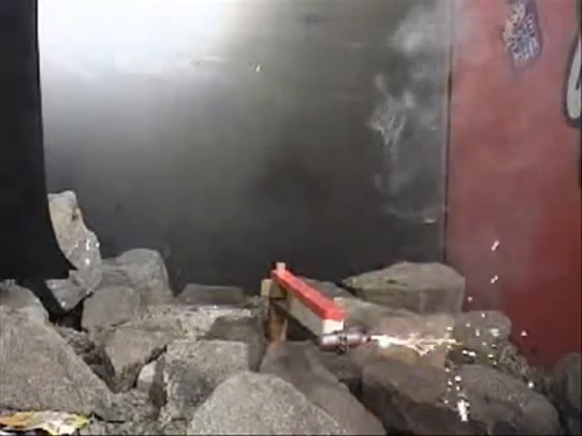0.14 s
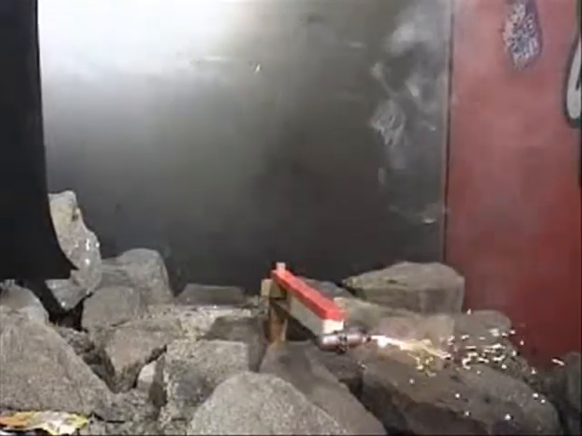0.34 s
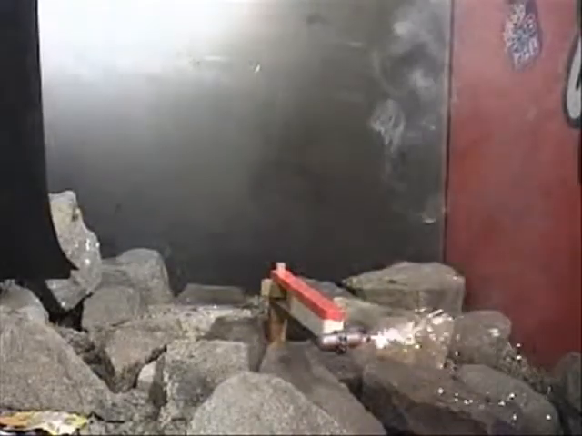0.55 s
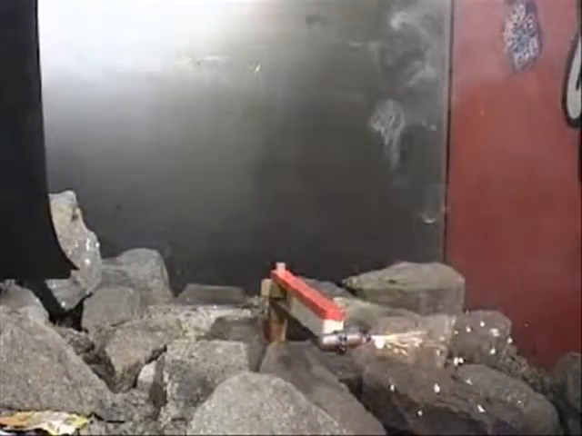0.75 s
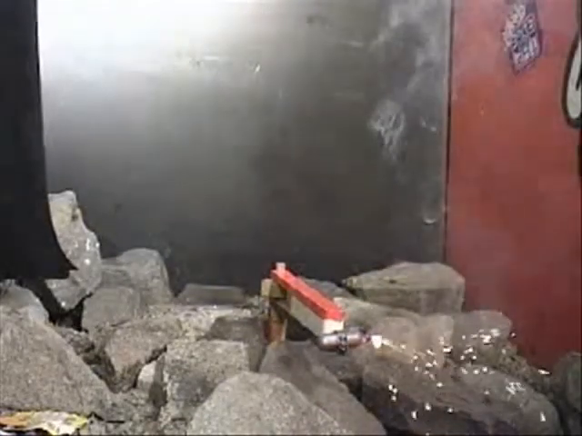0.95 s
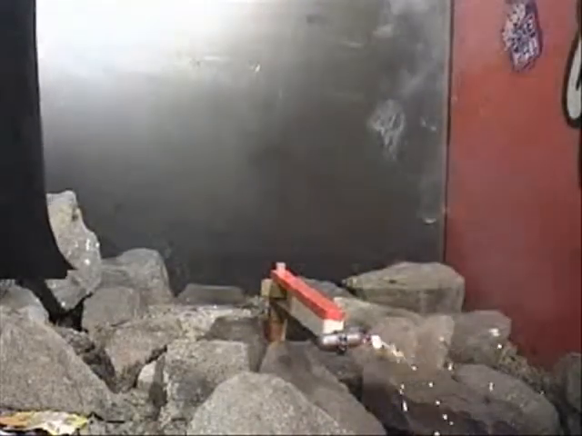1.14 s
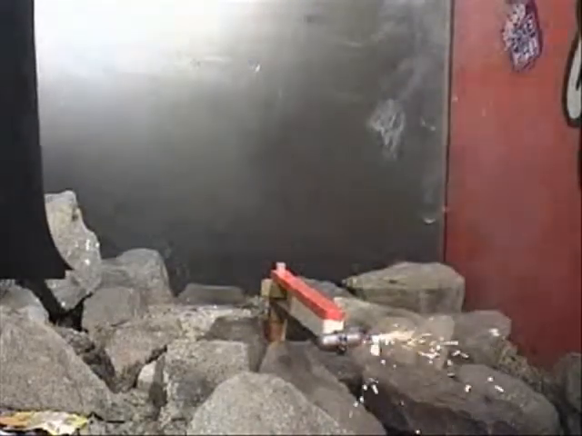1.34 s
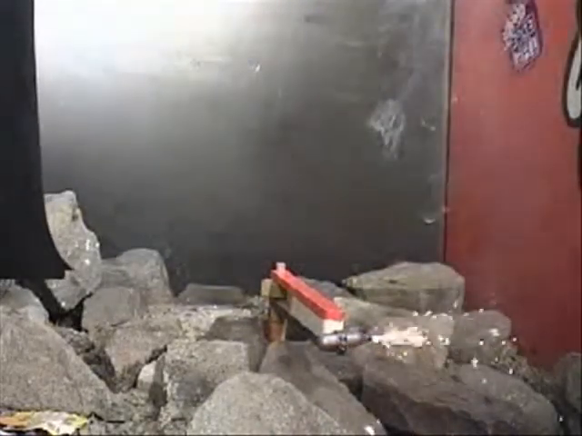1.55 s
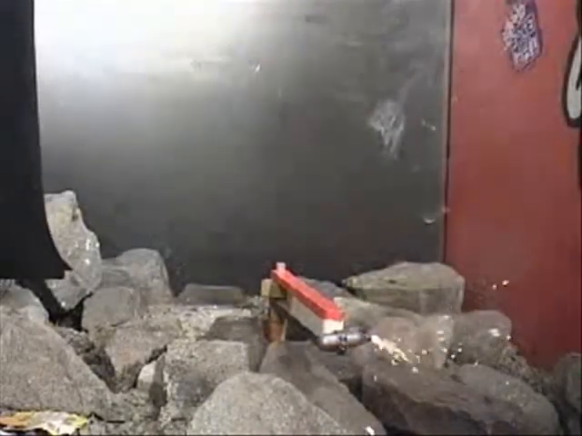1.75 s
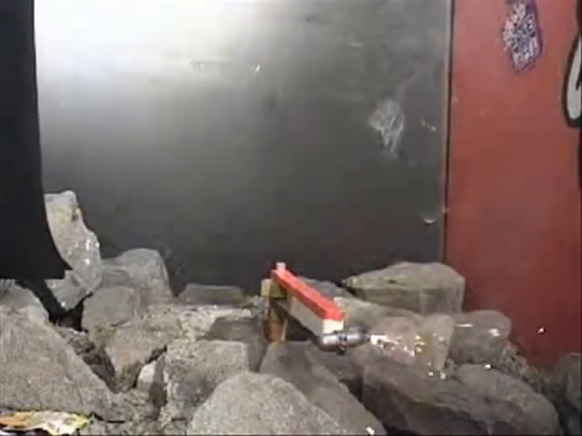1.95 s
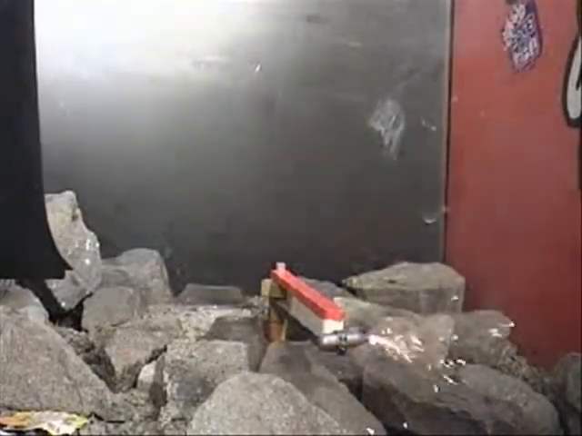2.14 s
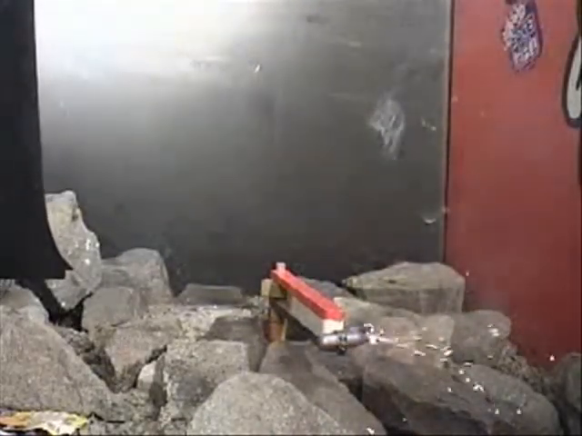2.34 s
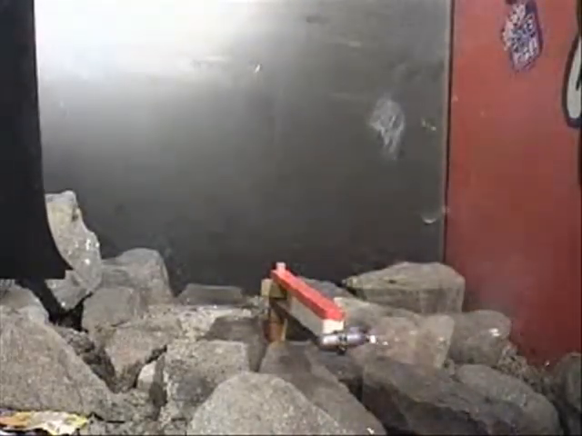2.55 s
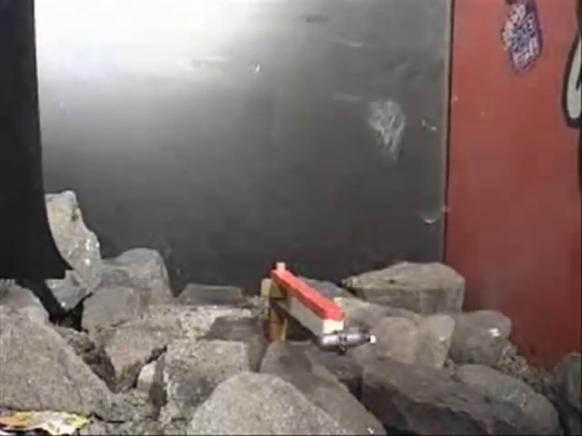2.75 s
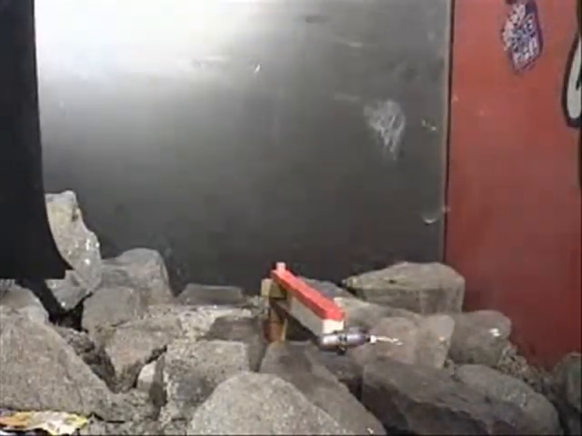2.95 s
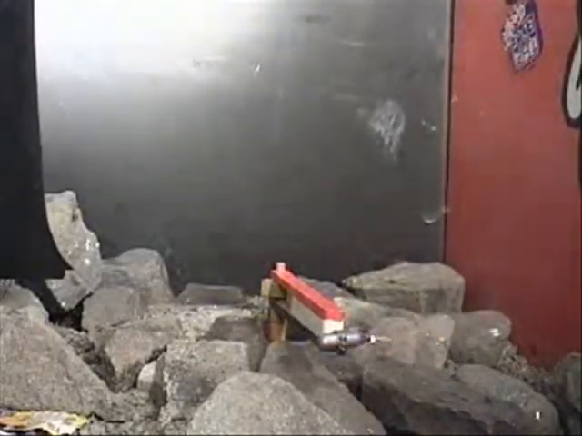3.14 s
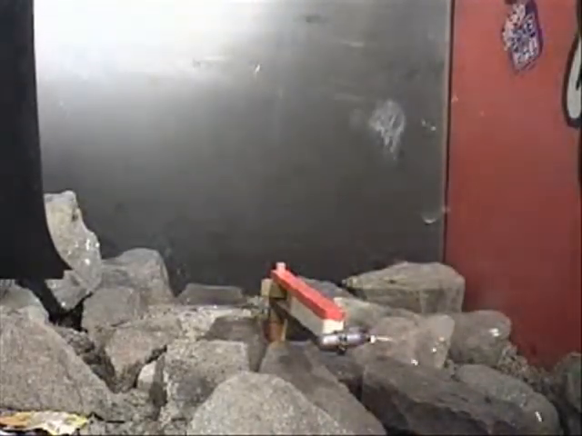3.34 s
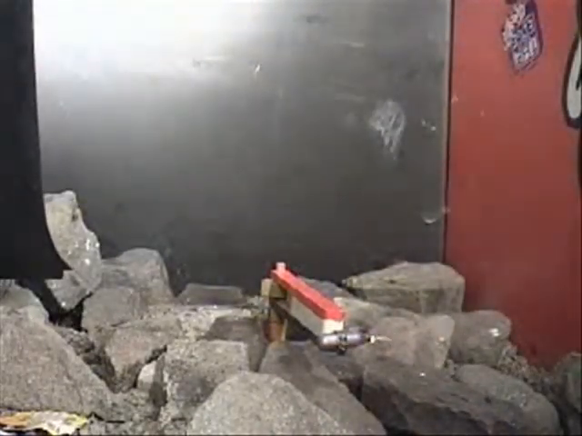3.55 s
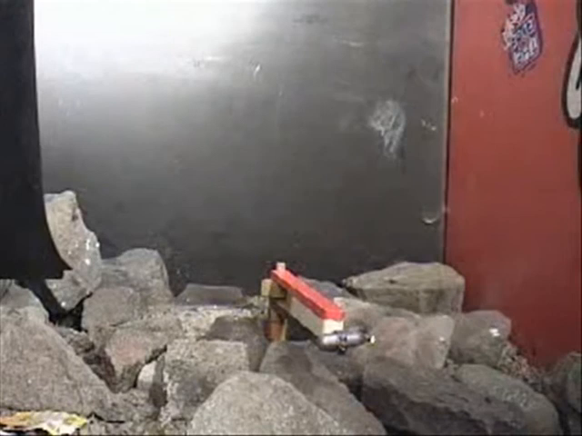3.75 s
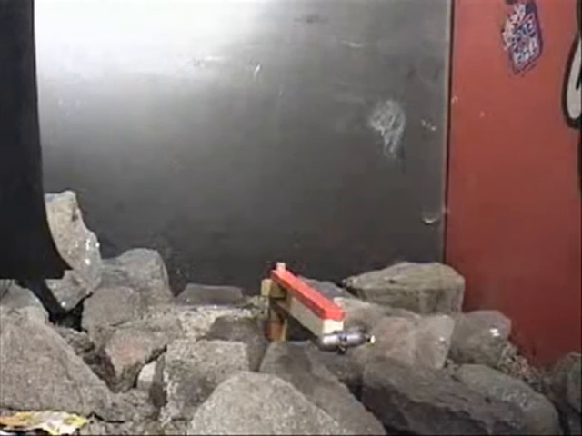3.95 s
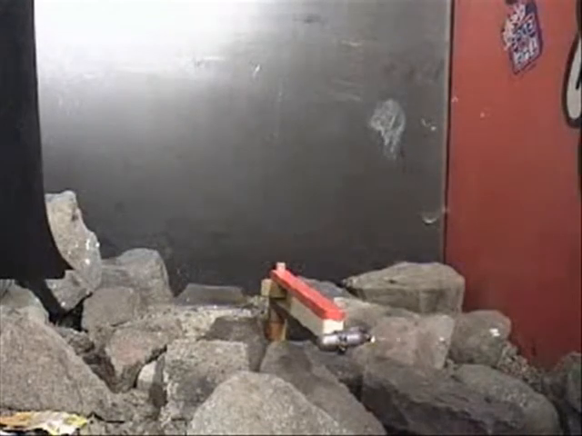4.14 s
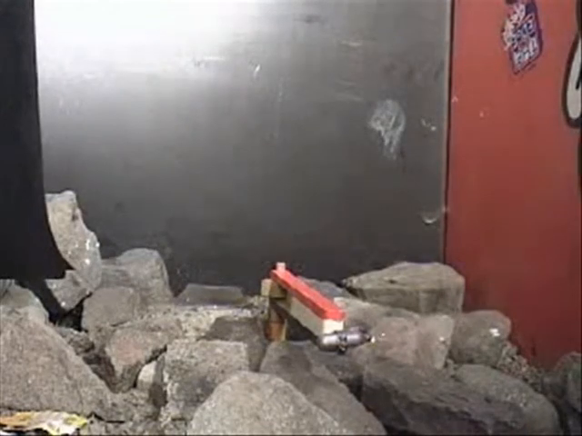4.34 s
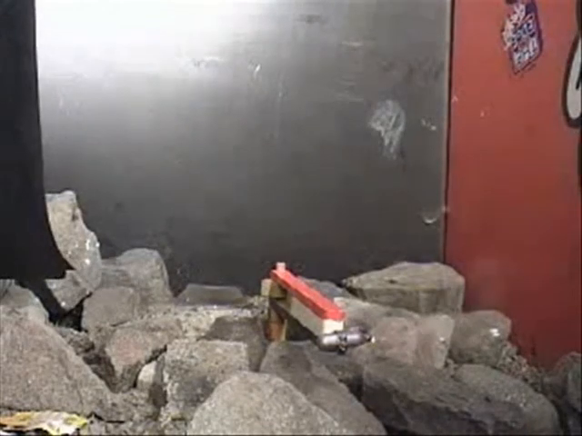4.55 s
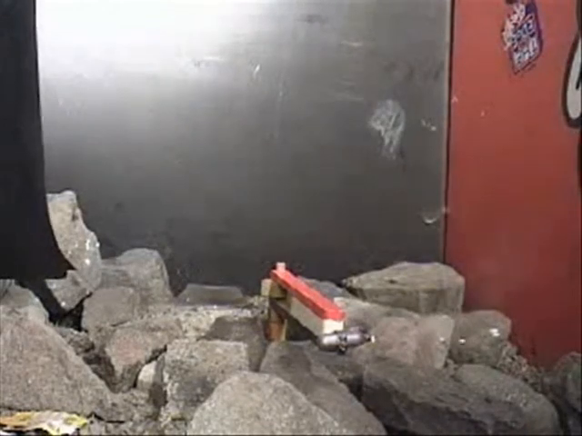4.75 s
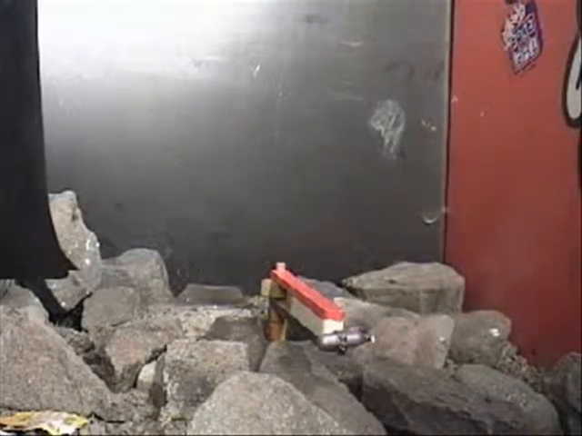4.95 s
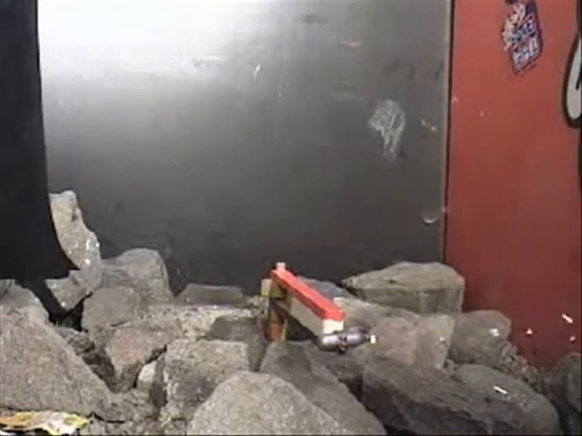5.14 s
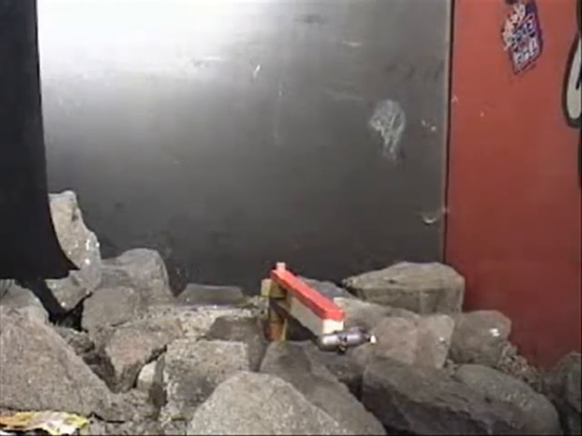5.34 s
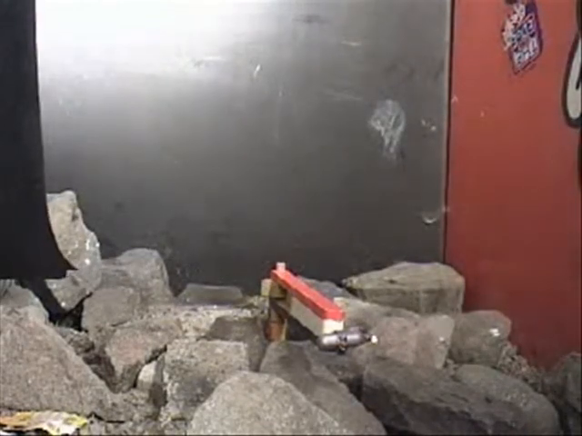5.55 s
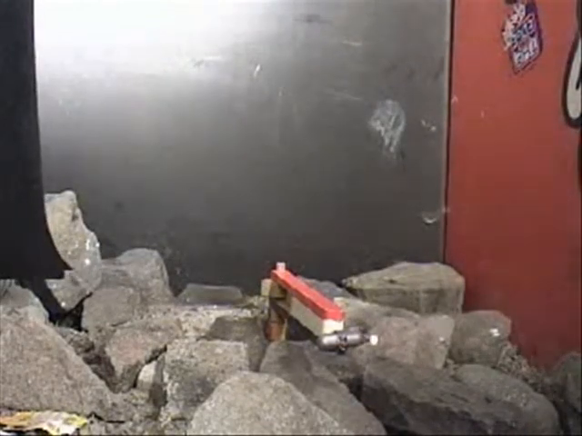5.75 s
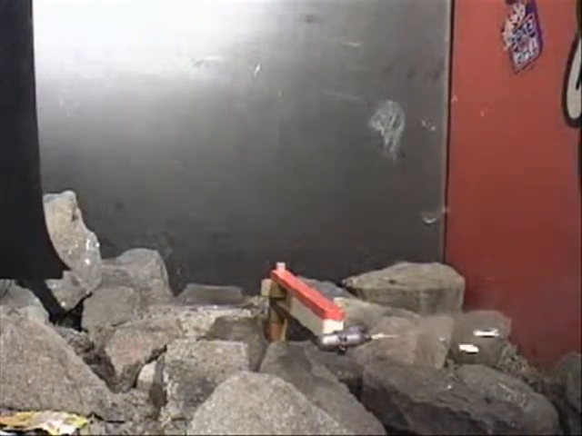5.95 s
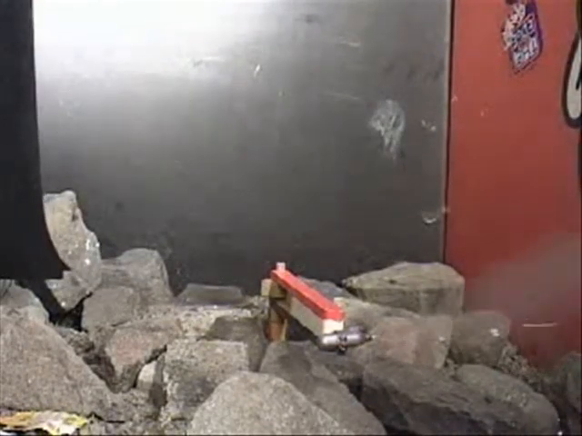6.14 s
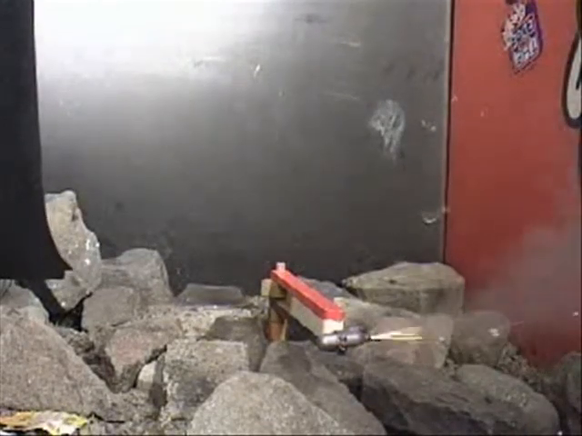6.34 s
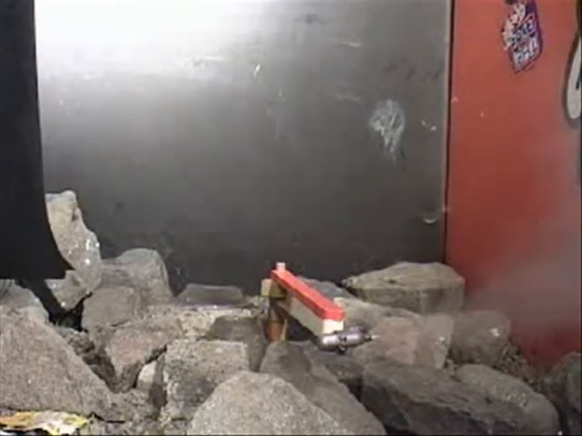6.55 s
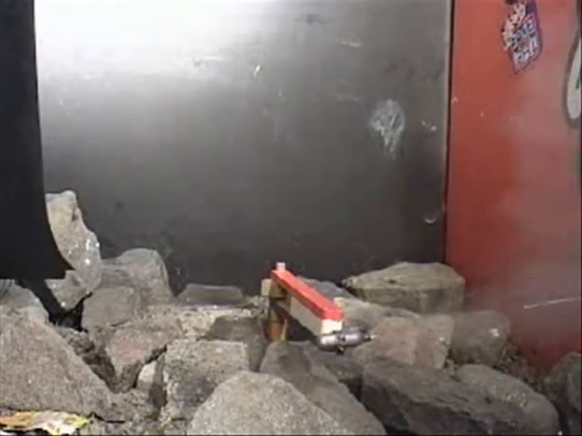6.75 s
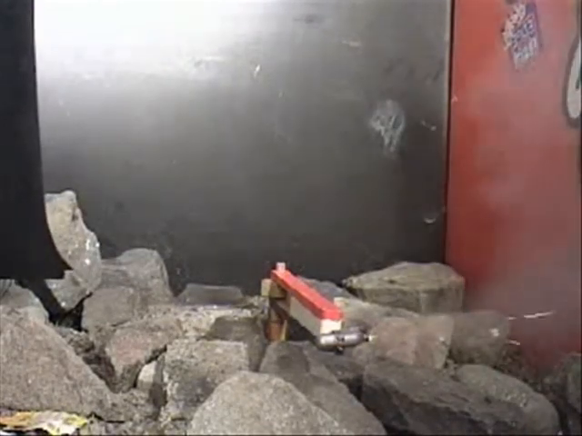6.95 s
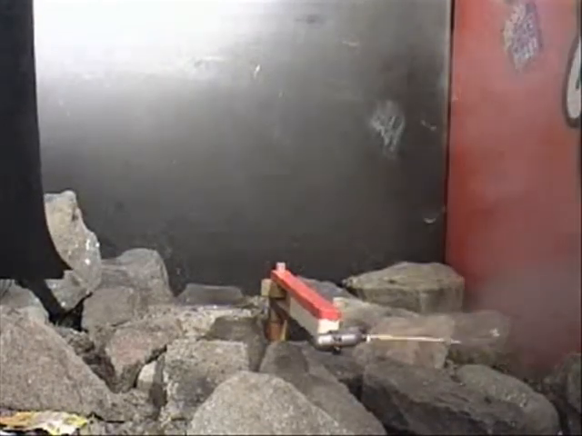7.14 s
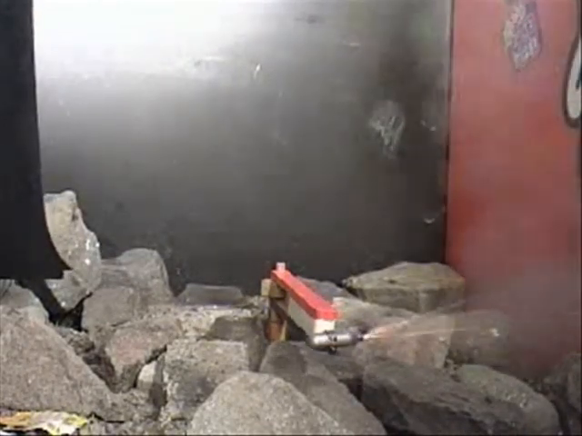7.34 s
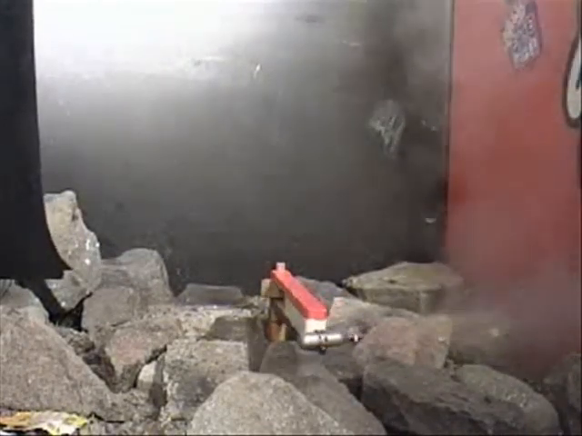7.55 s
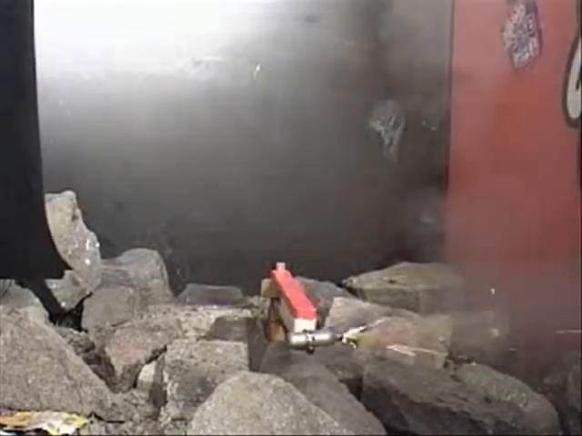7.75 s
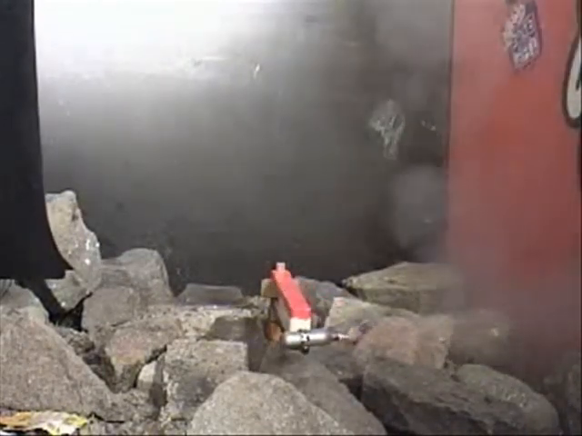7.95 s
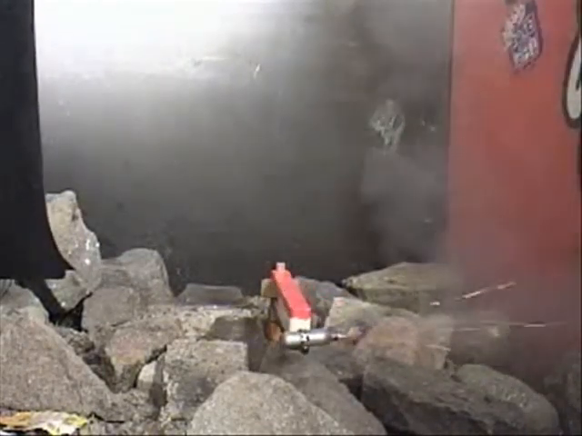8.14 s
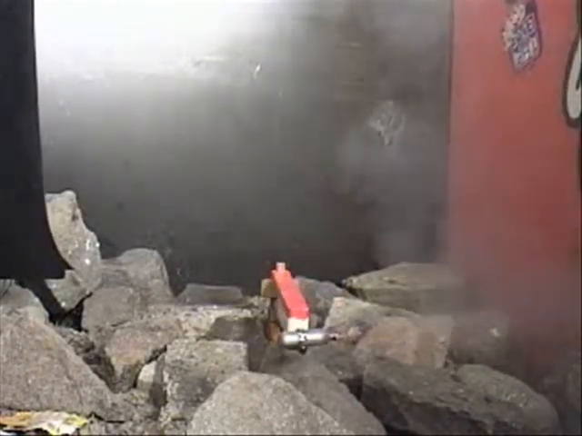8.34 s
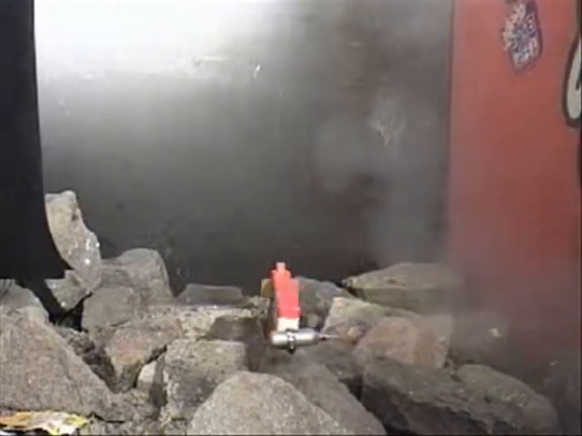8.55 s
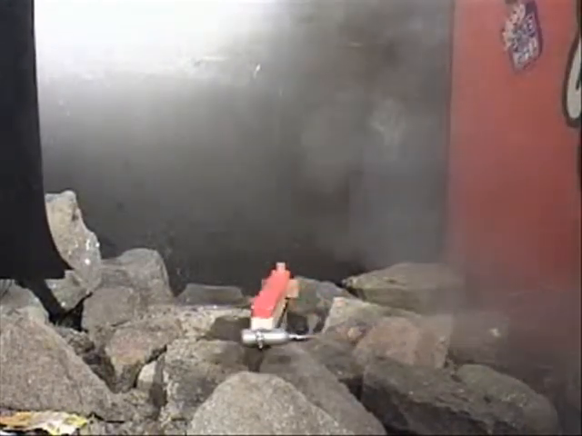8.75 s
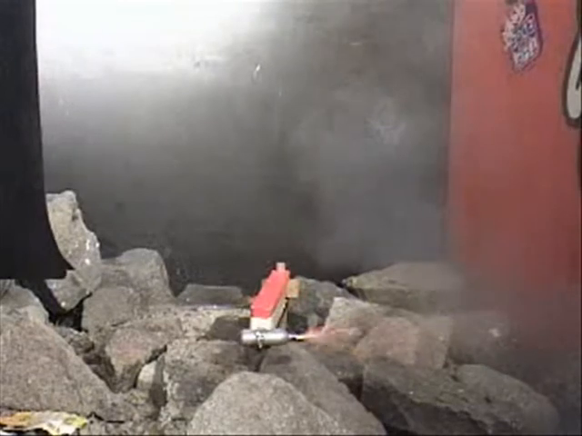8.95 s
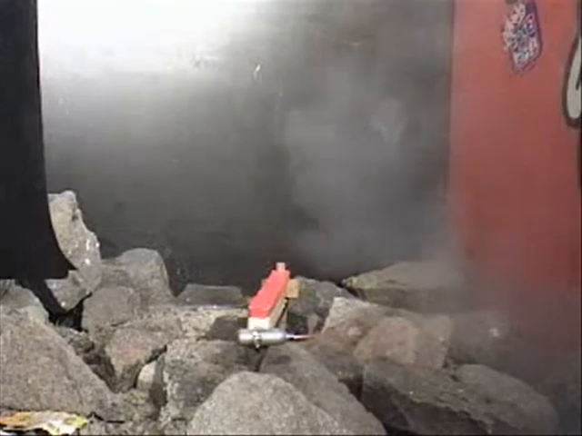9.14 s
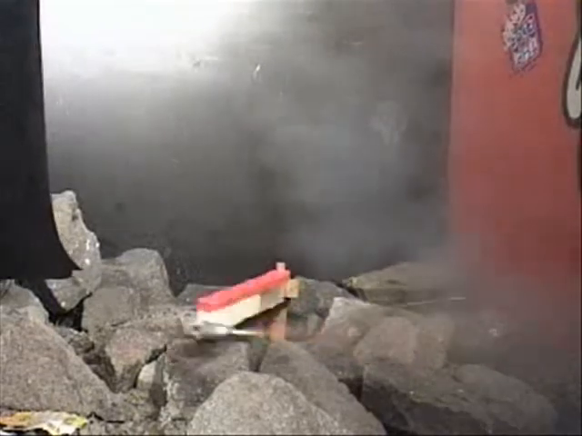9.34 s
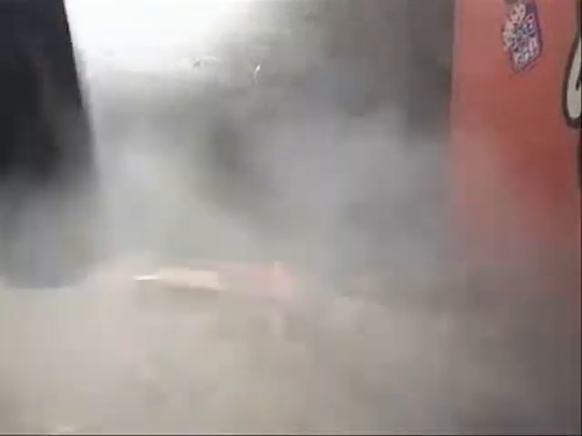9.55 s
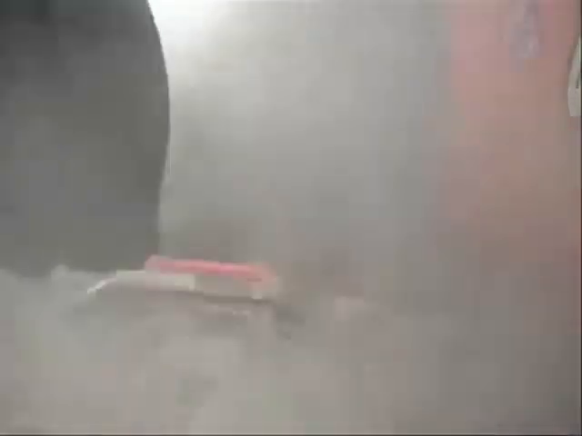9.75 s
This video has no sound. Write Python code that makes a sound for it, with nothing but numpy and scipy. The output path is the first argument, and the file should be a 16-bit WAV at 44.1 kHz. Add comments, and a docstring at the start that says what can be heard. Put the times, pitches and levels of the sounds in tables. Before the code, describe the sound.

A fuse fizzes and spits in a small rocket motor among rocks outdoors, then sinks to a faint smoulder. The motor coughs several times and catches with a sharp puff and a low thump, building into a loud, steady jet hiss. Its tone shifts as it swings round, until the exhaust hits the microphone with a rough, rumbling rush. Far traffic hums very faintly underneath.

```python
"""Small rocket motor among rocks

A fuse spits and smoulders into the nozzle of a motor clamped near a wall. The charge coughs, catches
and blows a steady turbulent jet, coloured by the resonances and echoes of the rocks. The motor swings
round until its exhaust buffets the microphone. Far traffic hums below, with a faint sinking tone.
All passes through a tape camcorder's comb filter, tuned to cancel head-drum noise."""
import sys
import numpy as np
from scipy import signal
from scipy.fft import rfft, irfft, next_fast_len
from scipy.io import wavfile

SR = 44100
rng = np.random.default_rng(int(sys.argv[2]) if len(sys.argv) > 2 else 0)


def dump(signal):
    """Clip the signal to [-1, 1] and save it as 16-bit WAV at the path in sys.argv[1]."""
    limited = np.clip(np.atleast_2d(signal).T, -1, 1)
    pcm = np.round(limited * 32767).astype(np.int16)
    wavfile.write(sys.argv[1], SR, pcm)


N = 431298
TIME = np.arange(N) / SR
FFT_SIZE = next_fast_len(N + SR // 2)
HZ = np.maximum(np.fft.rfftfreq(FFT_SIZE, 1 / SR), 1)


def from_db(db):
    """Amplitude ratio of a level in decibels."""
    return 10 ** (np.asarray(db) / 20)


def unit_rms(x):
    """Normalisation to unit mean power."""
    return x / np.sqrt(np.mean(x ** 2) + 1e-20)


def in_time(rows):
    """Linear interpolation of each column of a time table at every sample."""
    times, *columns = np.transpose(rows)
    return [np.interp(TIME, times, column) for column in columns]


def at_hz(rows):
    """Interpolation of a frequency table on a logarithmic axis."""
    hz, values = np.transpose(rows)
    return np.interp(np.log(HZ), np.log(hz), values)


def filtered(x, response):
    """Convolution theorem: filtering multiplies the spectrum by a response."""
    return irfft(rfft(x, FFT_SIZE) * response, FFT_SIZE)[..., :N]


def drift(corner_hz):
    """Random fluctuation of unit rms: white noise through a two-pole low-pass."""
    pole = np.exp(-40 * np.pi * corner_hz / SR)   # one step per 20 samples
    slow = signal.lfilter([1], [1, -2 * pole, pole * pole], rng.standard_normal(N // 20 + 4002))[4000:]
    return np.interp(np.arange(N) / 20, np.arange(len(slow)), unit_rms(slow))


def stereo_noise(spectrum, correlation):
    """Partial coherence: the sum and difference of two independent coloured noises."""
    mid, side = rng.standard_normal((2, N))
    colour = from_db(at_hz(spectrum))
    mid = filtered(mid, colour * np.sqrt(1 + correlation))
    side = filtered(side, colour * np.sqrt(1 - correlation))
    return unit_rms(np.array([mid + side, mid - side]))


# Spectrum of far traffic: f/Hz, relative level/dB
TRAFFIC_SPECTRUM = [(20, -18), (45, -5.5), (90, 1), (130, -3), (220, -9.5), (290, -9.5), (350, -13),
                    (420, -11.5), (800, -12), (1350, -15), (1600, -25), (2200, -32.5), (6000, -27),
                    (14500, -35)]
# Its likeness in the two channels: f/Hz, correlation
TRAFFIC_CORRELATION = [(60, 0.75), (230, 0.52), (910, 0.43), (3550, 0.42), (13800, 0.11)]
# Its balance: f/Hz, level left over right/dB
TRAFFIC_BALANCE = [(60, 4.5), (370, 4.5), (2250, 6.5), (13800, -6)]

def traffic():
    """Incoherent superposition: far traffic merges into a dull hum, stronger on the left."""
    hum = stereo_noise(TRAFFIC_SPECTRUM, at_hz(TRAFFIC_CORRELATION)) * from_db(-49 + .8 * drift(6))
    return filtered(hum, from_db(at_hz(TRAFFIC_BALANCE) / 2 * [[1], [-1]]))


def far_tone(start_hz=339, sag_hz_per_s=4.6):
    """Slow modulation: a faint sinusoid sinks in pitch and wavers in level, stronger on the left."""
    hz = start_hz - sag_hz_per_s * TIME + 1.5 * drift(1)
    level_db = -61.5 + 2.5 * drift(1.5) + [[2], [-2]]
    return np.sin(2 * np.pi * np.cumsum(hz) / SR) * from_db(level_db)


# Exhaust pressure on the microphone ports: t/s, level/dB
BUFFET_LEVEL = [(8.8, -57.5), (9.2, -28.5), (9.45, -24), (9.5, -17.5), (9.78, -17.5)]
# Its spectrum: f/Hz, relative level/dB
BUFFET_SPECTRUM = [(25, -18), (100, -1), (250, 0.5), (700, 1), (1500, -2), (4000, -7), (9000, -15),
                   (14500, -24)]

def buffeting():
    """Pseudo-sound: eddies press on the ports, driving the channels partly in antiphase."""
    level_db, = in_time(BUFFET_LEVEL)
    return stereo_noise(BUFFET_SPECTRUM, correlation=-0.47) * from_db(level_db + 0.91 * drift(25))


def rock_scattering(t60_s=0.059, echo_db=-8):
    """Diffuse reflection: the response of direct sound plus decaying echoes, distinct in each channel."""
    t = np.arange(SR // 4) / SR
    echoes = rng.standard_normal((2, len(t))) * from_db(-60 * t / t60_s) * (t > .002)
    echoes /= np.sqrt(np.sum(echoes ** 2, axis=1, keepdims=True))
    return 1 + from_db(echo_db) * rfft(echoes, FFT_SIZE)


# Swing of the motor: t/s, heading (0 side-on, 1 half turned, 2 turned, 3 facing the microphone)
HEADING = [(7.1, 0), (7.9, 1), (8.35, 1.1), (8.8, 2), (9.25, 2), (9.45, 3)]
# Resonances of rocks and wall: f/Hz, width/Hz, gain/dB at headings 0, 1 and 2
RESONANCES = [(241, 83, 4, 5.5, 2), (521, 156, 9.5, 12.5, 8.5), (853, 64, 7.5, 4, 4),
              (1470, 880, -6, -2, 0.5), (1824, 340, 4.5, 1.5, 4.5), (2132, 77, -7, 1, 4),
              (2650, 310, 3, -3, 0.5), (2980, 210, -2.5, 5, 2.5), (3238, 282, 3, 6.5, 4.5),
              (3970, 450, -4, -5, 0.2), (4400, 350, 2.5, -1.5, -5), (4740, 290, -1.5, -5, -1.5),
              (5360, 250, 2.5, 2.5, 6.5), (5800, 880, -3, -5.5, -5), (6690, 290, 2.5, 5, 3),
              (7050, 185, 8, 6.5, 0), (7940, 300, 0.5, 2.5, -1), (8200, 540, -4, -2.5, 4),
              (9620, 790, -3.5, 3, 0.5), (10660, 1540, 2, 1, 2), (12000, 830, -4.5, 2, 2)]
# Likeness of the flame in the two channels: f/Hz, correlation
FLAME_CORRELATION = [(60, 0.78), (130, 0.93), (280, 0.99), (620, 0.84), (1340, 0.99), (2920, 1),
                     (6350, 0.81), (13800, 0.26)]
# Balance of the motor: f/Hz, level left over right/dB
MOTOR_BALANCE = [(60, 1), (230, 8), (910, 4.5), (3550, 2.5), (13800, 0)]

def among_rocks(motor):
    """Directivity: each heading excites its own resonances and echoes; the plume widens the image."""
    correlation = at_hz(FLAME_CORRELATION)
    mid, side = filtered(motor, np.sqrt([(1 + correlation) / 2, (1 - correlation) / 2]))
    stereo = np.array([mid + side, mid - side])
    balance_db = at_hz(MOTOR_BALANCE) / 2 * [[1], [-1]]
    peaks = np.array([2. ** -(2 * (HZ - hz) / width) ** 2 for hz, width, *_ in RESONANCES])
    gains_db = [*(np.array(RESONANCES)[:, 2:].T @ peaks), 0]   # head-on, the blast hides the resonances
    heading, = in_time(HEADING)
    out = 0
    for k, gain_db in enumerate(gains_db):
        crossfade = np.clip(1 - np.abs(heading - k), 0, 1)
        out += crossfade * filtered(stereo, rock_scattering() * from_db(gain_db + balance_db))
    return out


# Pressure surges as the charge catches: t/s, envelope peak level/dB
SURGES = [(5.497, -35), (5.928, -24)]

def thumps(ring_hz=170, rise_s=0.0025):
    """Damped oscillation: each pressure surge rings low for a cycle or two."""
    impulses = np.zeros(N)
    for start_s, peak_db in SURGES:
        impulses[round(start_s * SR)] = from_db(peak_db)
    t = np.arange(SR // 8) / SR
    envelope = t / rise_s * np.exp(1 - t / rise_s)
    return signal.fftconvolve(impulses, np.sin(2 * np.pi * ring_hz * t) * envelope)[:N]


def turbulence(crackle_share, spread_db, pops_per_s=4000):
    """Gaussian noise of the gas flow plus shot noise of burning specks popping in it."""
    sizes = from_db(spread_db * np.minimum(rng.exponential(1, N), 4)) * rng.choice([-1, 1], N)
    specks = unit_rms(sizes * (rng.random(N) < pops_per_s / SR))
    return np.sqrt(1 - crackle_share) * rng.standard_normal(N) + np.sqrt(crackle_share) * specks


# Spits and coughs of gas: t/s, onset level before filtering/dB
PUFFS = [(1.1433, -42), (1.495, -42), (1.6092, -31), (1.95, -34.5), (3.688, -47), (4.242, -47),
         (4.751, -31.5), (5.139, -26.5), (5.4206, -33), (5.46, -34), (5.496, -16), (5.7548, -26)]

def spits(decay_s=0.022):
    """Transient flow: each puff of gas starts at once and dies under a Gaussian envelope."""
    t = np.arange(SR // 4) / SR
    envelope = np.zeros(N)
    for start_s, onset_db in PUFFS:
        i = round(start_s * SR)
        envelope[i:i + len(t)] += from_db(onset_db) * np.exp(-(t / decay_s) ** 2)
    puffs = turbulence(crackle_share=0.15, spread_db=7) * envelope
    low_pass = 1 / np.sqrt((1 + (900 / HZ) ** 2) * (1 + (HZ / 8000) ** 4))
    return filtered(puffs, low_pass)


# Roar of the burn: t/s, base level/dB
ROAR_LEVEL = [(0, -44.5), (.25, -42), (.55, -43.5), (1.02, -45), (1.7, -44), (2.3, -48), (2.4, -51),
              (2.6, -56.5), (3.4, -58), (4.55, -57.5), (4.62, -47), (4.86, -47), (5.01, -42),
              (5.178, -36.5), (5.26, -49), (5.49, -45), (5.5, -32), (5.682, -35.5), (5.925, -24.5),
              (5.945, -30), (6.3, -26.5), (6.55, -22.5), (9.15, -22.5), (9.78, -25.5)]
# Passage of fire from fuse to charge: t/s, share of charge, sizzle over roar/dB, rumble over roar/dB
IGNITION = [(.3, 0.23, -1, -6), (1.3, 0.2, -1.5, -3.5), (1.5, .17, 1, -5.5), (2.3, .17, 2.5, -3.5),
            (2.6, 0.26, 6, -5.5), (4.0, 0.1, 5, -5), (4.1, 0.1, 8.5, -7), (4.55, 0, 8, -5),
            (4.62, .45, 0, -4.5), (5.0, 0.43, 4.5, -13.5), (5.9, 0.38, 3.5, -11), (6.1, 0.93, 2, -15.5),
            (6.4, 1, 2.5, -16), (9.2, 1, 3, -13), (9.45, 0.6, 3.5, -7)]
# Spectra of the burning fuse and charge: f/Hz, relative level/dB
FUSE_SPECTRUM = [(60, -8), (150, -8.5), (400, -10.5), (1200, -6), (2200, -3), (4200, -5), (6000, -3.5),
                 (9000, -1), (12500, -1), (14500, -22)]
CHARGE_SPECTRUM = [(60, -23), (150, -15.5), (400, -14.5), (1200, -11), (2500, -3), (3600, -1), (6000, -3.5),
                   (9000, -6), (12500, -11), (14500, -24.5)]
# Flares of the flame: t/s, roar gain/dB, half-width/s
FLARES = [(0.263, 3.5, 0.043), (.72, 2, 0.015), (.778, 6, .025), (0.85, 6.5, 0.028), (0.922, 3.5, .015),
          (1.158, 3.5, 0.019), (1.25, 4.5, 0.022), (1.531, 8, 0.023), (1.575, 8.5, 0.02), (1.676, 3, .018),
          (1.762, 8, 0.036), (1.886, 6.5, .037), (1.954, 3, .014), (2.1, 7, 0.024), (2.22, 8, .023),
          (2.318, 5.5, 0.016), (2.948, 4, .071), (4.1, 3, .03), (4.253, 6, .03), (4.622, 5.5, 0.016),
          (5.057, 10.5, .035), (5.29, 4, .015), (5.624, 3.5, .03), (5.845, 1.5, .03), (5.915, 2.5, 0.016),
          (6.11, 3, 0.045)]
# Lulls in which it all but dies: t/s, duration/s, roar loss/dB
FLAME_LULLS = [(0.602, 0.097, 2), (2.702, 0.17, 3), (3.6, 0.44, 5.5)]

def flame(charge_reached_s=4.9, lull_edge_s=0.03):
    """Combustion noise: three bands flutter partly together. Returns two rows, nozzle and plume."""
    roar_db, = in_time(ROAR_LEVEL)
    charge_share, sizzle_db, rumble_db = in_time(IGNITION)
    flare_db = sum(gain_db * np.exp(-((TIME - s) / half_s) ** 2) for s, gain_db, half_s in FLARES)
    lull_db = 0
    for start_s, duration_s, loss_db in FLAME_LULLS:
        age = TIME - start_s
        lull_db += loss_db / 2 * (np.tanh(age / lull_edge_s) - np.tanh((age - duration_s) / lull_edge_s))
    sizzle_flare_db = np.where(TIME < charge_reached_s, 0.098, 0.55) * flare_db
    low_pass = 1 / (1 + (HZ / 1450) ** 8)
    high_pass = 1 / (1 + (5000 / HZ) ** 8)
    band_pass = np.clip(1 - low_pass - high_pass, 0, 1)
    bands = [(low_pass, rumble_db + 0.88 * flare_db, 1.5),   # rumble
             (band_pass, flare_db - lull_db, .7),   # roar
             (high_pass, sizzle_db + sizzle_flare_db - 1.9 * lull_db, .6)]   # sizzle
    common_flutter_db = 0.81 * drift(5.4) + 0.65 * drift(65)
    gas = np.array([turbulence(crackle_share=0.32, spread_db=6.5), rng.standard_normal(N)])
    out = 0
    for response, offset_db, flutter_depth in bands:
        fuse = unit_rms(filtered(gas, from_db(at_hz(FUSE_SPECTRUM)) * response))
        charge = unit_rms(filtered(gas, from_db(at_hz(CHARGE_SPECTRUM)) * response))
        band = (1 - charge_share) * fuse + charge_share * charge
        flutter_db = common_flutter_db + flutter_depth * (drift(39) + 0.73 * drift(3.5))
        out += band * from_db(roar_db + offset_db + flutter_db)
    return out


def scene():
    """Superposition of the motor among the rocks, its exhaust on the ports and the far background."""
    motor = flame() + (spits() + thumps()) * [[1], [.4]]   # bursts come mostly from the nozzle
    return among_rocks(motor) + buffeting() + traffic() + far_tone()


def record(dry):
    """Soft saturation, destructive interference of what repeats each drum turn, then a treble cut."""
    ceiling, feedback, cutoff_hz = 0.53, .46, 14400
    loop_s, tap_s = 321 / 48000, 319.5 / 48000
    saturated = ceiling * np.tanh(dry / ceiling)
    loop, tap = np.exp(-2j * np.pi * HZ * loop_s), np.exp(-2j * np.pi * HZ * tap_s)
    depth = .74 + .26 / (1 + (HZ / 1500) ** 2)   # the notches are deepest in the bass
    comb = 1 - depth * (1 - feedback) * tap / (1 - feedback * loop)
    low_pass = signal.ellip(12, .5, 75, cutoff_hz, fs=SR, output="sos")
    return signal.sosfilt(low_pass, filtered(saturated, comb))


dry = scene()
out = record(dry)
dump(out)
```